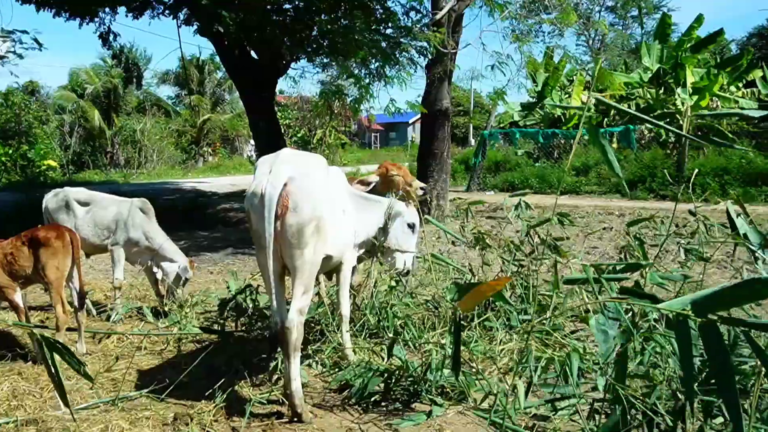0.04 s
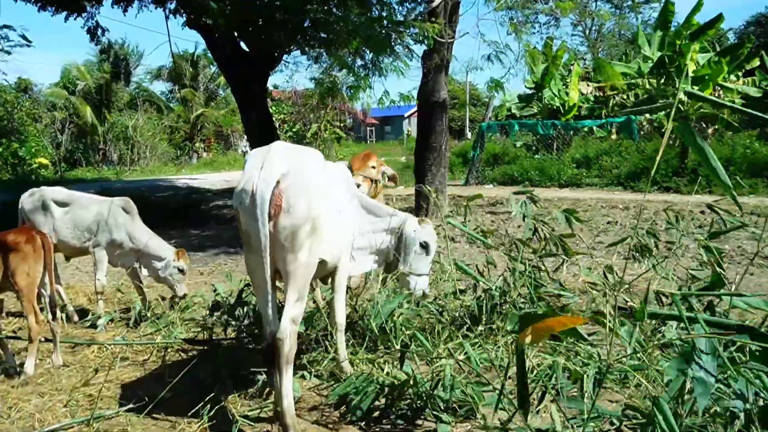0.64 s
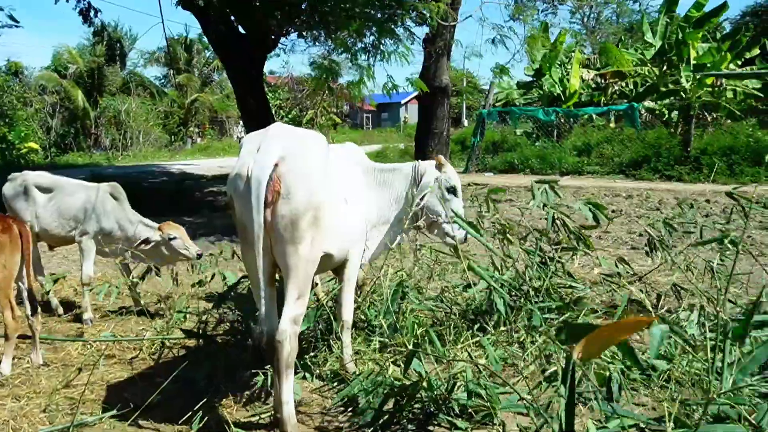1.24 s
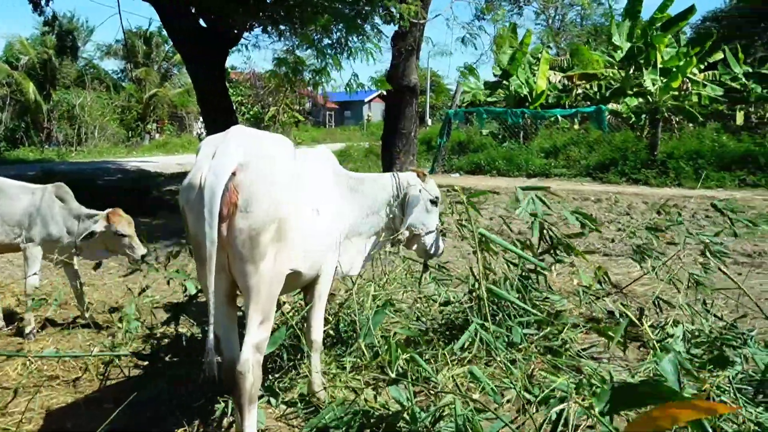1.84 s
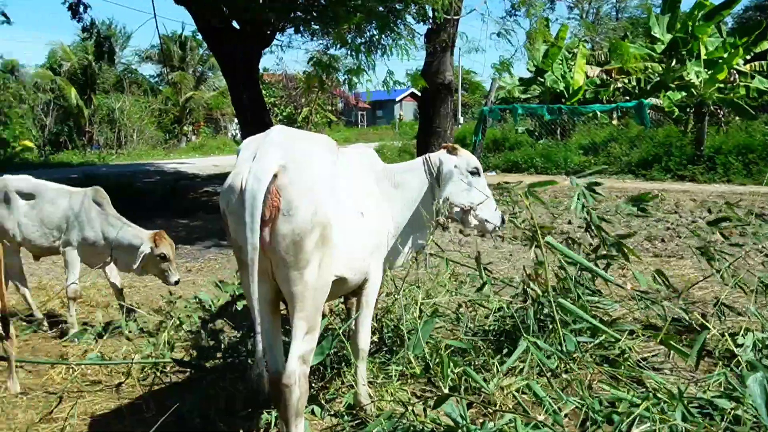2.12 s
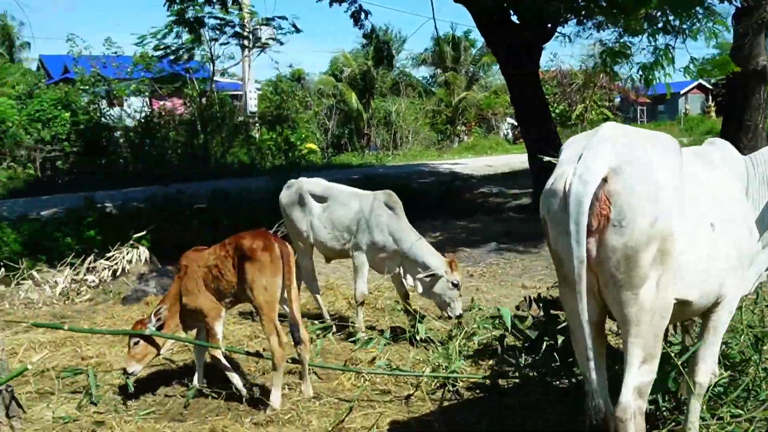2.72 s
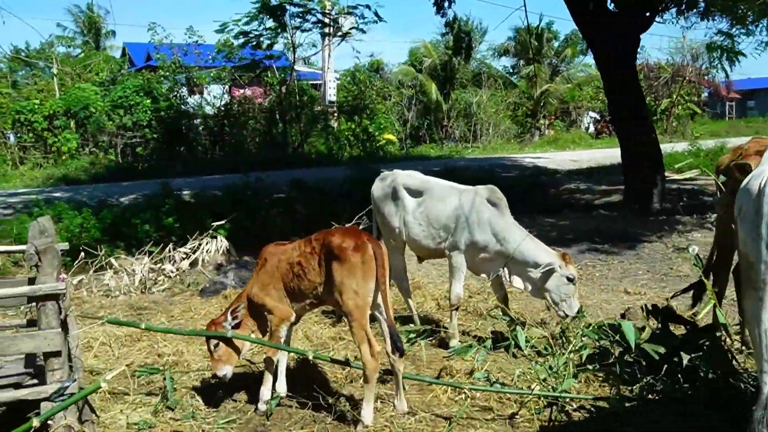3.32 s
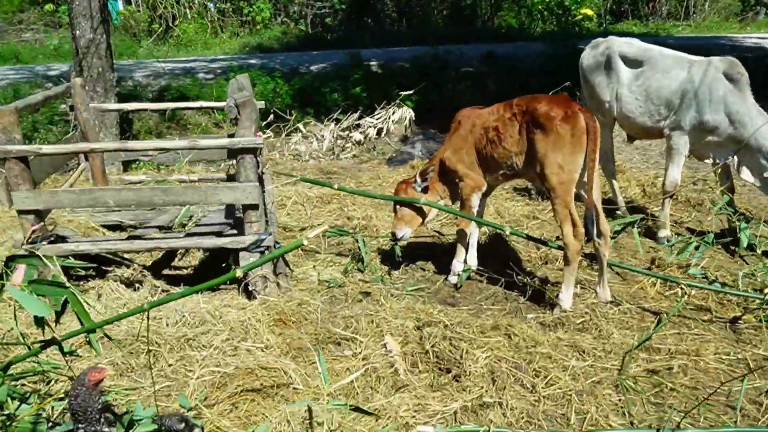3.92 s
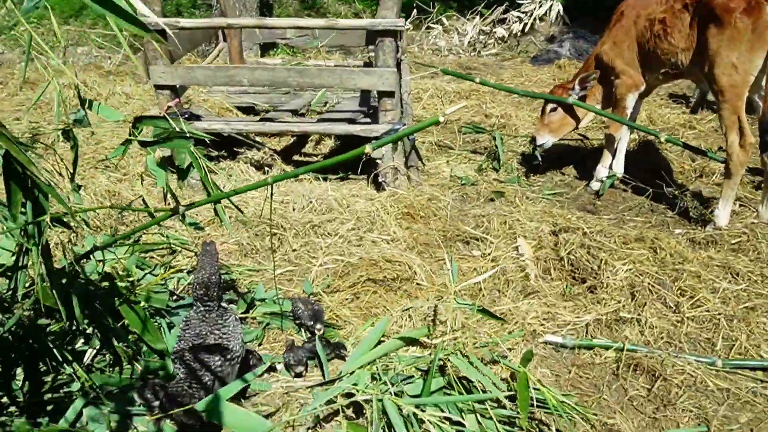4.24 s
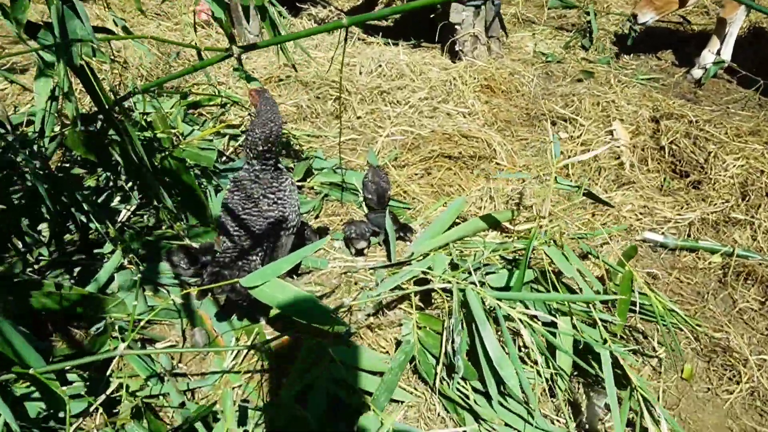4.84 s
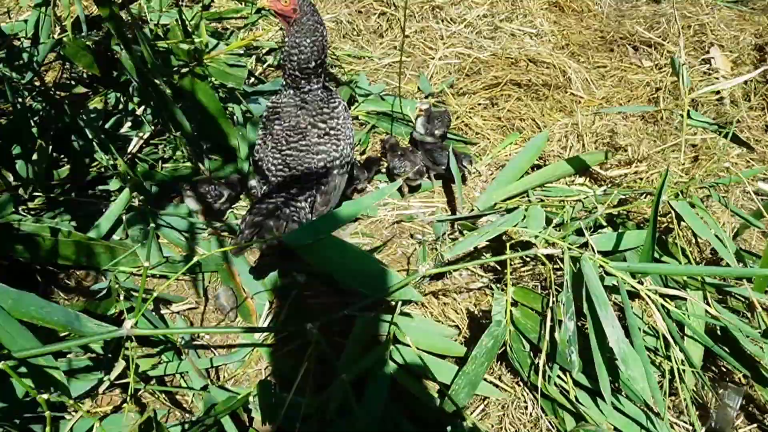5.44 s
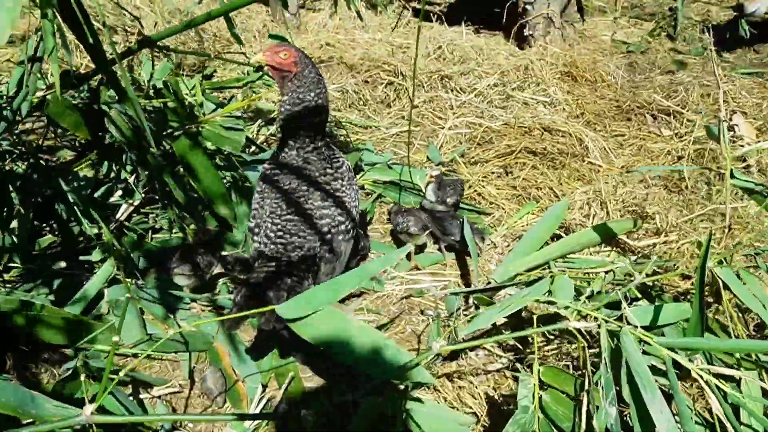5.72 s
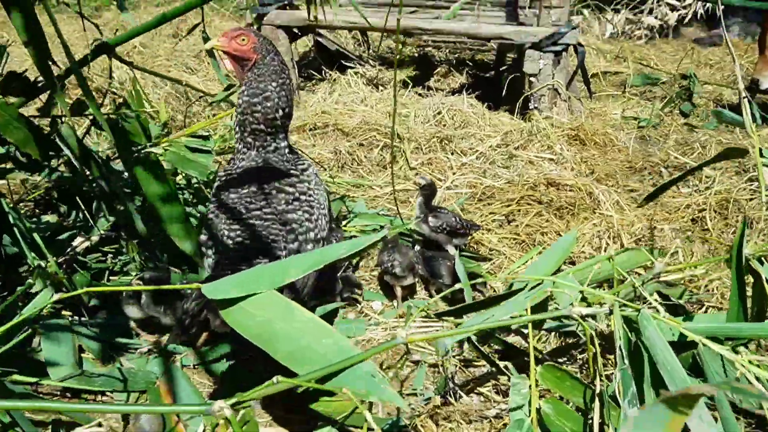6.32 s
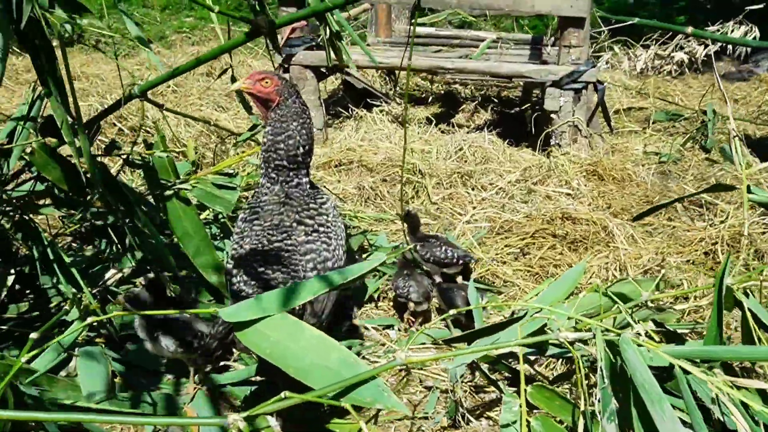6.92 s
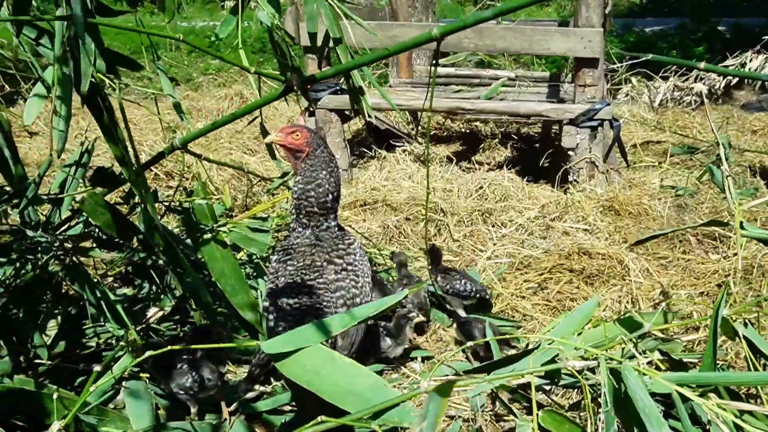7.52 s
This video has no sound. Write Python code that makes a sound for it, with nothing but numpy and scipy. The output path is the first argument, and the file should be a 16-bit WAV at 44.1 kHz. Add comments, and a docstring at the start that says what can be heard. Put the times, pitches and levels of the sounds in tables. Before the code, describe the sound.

In a breezy farmyard, cattle pull at a heap of cut cane leaves, which rustle steadily while stalks snap and a bundle drops with a soft bump. Roosters crow faintly far away, and gusts rumble lightly on the microphone. Chicks peep in short, thin whistles, growing closer and busier. Near the end dry straw crunches and a nearby hen clucks and gives fluttering warning trills.

```python
"""A farmyard on a breezy day. Cattle pull at a heap of cut cane leaves, which rustle, crackle and
snap, and a bundle drops with a bump. Gusts rumble on the microphone over soft air and a faint hum.
Roosters crow far off and a distant bird gives a few low calls. Chicks peep in short whistled swoops
as they come nearer; their hen clucks and, near the end, gives fluttering warning trills.
The birds are gliding tones with weak overtones; the leaves and the wind are shaped noise."""
import sys
import numpy as np
from scipy import signal
from scipy.fft import rfft, irfft, next_fast_len
from scipy.io import wavfile
from scipy.ndimage import uniform_filter1d

SR = 44100
rng = np.random.default_rng(int(sys.argv[2]) if len(sys.argv) > 2 else 0)


def put_to_file(sound):
    """Save the sound as 16-bit audio at rate SR, in the file named by the first command-line argument."""
    columns = np.atleast_2d(sound).T  # one column per channel
    safe = np.clip(columns, -1, 1)
    whole_steps = np.round(safe * 32767)
    wavfile.write(sys.argv[1], SR, whole_steps.astype(np.int16))


N = 333396
T = np.arange(N) / SR


def undb(db):
    """Turn decibels into a number to multiply by."""
    return 10 ** (np.asarray(db) / 20)


def unit(x):
    """Scale a sound to an average strength (rms) of 1."""
    return x / np.sqrt(np.mean(x ** 2))


def add(track, start, sound):
    """Mix a sound into a track at a time in seconds."""
    i = max(int(start * SR), 0)
    track[..., i:i + sound.shape[-1]] += sound[..., :max(N - i, 0)]


def colour(x, points):
    """Turn lows and highs up or down along a curve of (Hz, dB) points."""
    hz, db = np.transpose(points)
    size = next_fast_len(N)
    bin_hz = np.maximum(np.arange(size // 2 + 1) * SR / size, 1)
    gain = undb(np.interp(np.log(bin_hz), np.log(hz), db))
    return irfft(rfft(x, size) * gain, size)[..., :N]


def resonate(x, hz, q):
    """Keep the sound near one frequency; a higher q keeps a narrower band."""
    hz = min(hz, SR / 3)
    return signal.lfilter(*signal.iirpeak(hz, max(q, 3 * hz / SR), fs=SR), x)


def resonate_twice(x, hz, q):
    """The same resonance twice, for a band with steeper sides."""
    return resonate(resonate(x, hz, q), hz, q)


def wander(rate, size=N):
    """A smooth random wobble of size near 1, changing about rate times a second."""
    points = rng.standard_normal(int(size / SR * rate) + 3)
    joined = np.interp(np.arange(size) / SR * rate, np.arange(len(points)), points)
    return uniform_filter1d(joined, max(int(SR / rate / 2), 1)) * np.sqrt(2)


def fade(t, edge):
    """A soft start and end, each lasting edge, in the same unit as t."""
    return np.sin(np.pi / 2 * np.clip(np.minimum(t - t[0], t[-1] - t) / edge, 0, 1)) ** 2


def stereo(mid, side):
    """Make left and right from what the ears share (mid) and what sets them apart (side)."""
    return np.array([mid + side, mid - side])


# The tone of the distant air. Each row: frequency in Hz, relative level in dB.
AIR_TONE = [(24, -33), (40, -1), (81, -1), (207, 3.5), (658, -7), (863, 0.5), (1130, 0), (1330, -11),
            (1680, -14), (3000, -1.5), (3900, -20), (6600, -120)]

def countryside(air_db=-49, hum_hz=59, hum_db=-61):
    """Soft distant air and a faint, wavering low hum."""
    air = unit(colour(rng.standard_normal((2, N)), AIR_TONE))
    mid, side = air * undb(air_db + .5 * wander(2.74))
    pitch = hum_hz * (1 + .03 * wander(8))
    hum = np.sqrt(2) * undb(hum_db) * np.sin(2 * np.pi * np.cumsum(pitch) / SR)
    return stereo(mid + hum, .22 * side)


# The rumble's tone before its top is softened. Each row: frequency in Hz, relative level in dB.
RUMBLE_TONE = [(12, -39), (20, -15), (53, -2), (112, -2), (192, -4), (353, -10.5), (422, -7.5),
               (512, -12.5), (700, -21.5), (910, -49), (1540, -120)]
# Gusts of wind. Each row: time of the peak in seconds, length in seconds, relative level in dB.
WIND_GUSTS = [(.15, 0.33, -49), (.73, 0.04, -48), (2.24, 0.19, -42.5), (2.385, .08, -42),
              (2.805, 0.076, -41.5), (3.33, 0.15, -40), (3.49, 0.068, -45), (4.47, 0.15, -35),
              (4.804, .27, -35.5), (5.215, 0.14, -38.5), (5.414, 0.16, -39.5)]

def wind(breeze_db=-53, gain_db=-2, eddy_db=-17):
    """The breeze rumbles on the microphone; strong gusts shed small swirls that sound higher."""
    power = undb(breeze_db + .5 * wander(9)) ** 2
    for peak, length, db in WIND_GUSTS:
        power += undb(db) ** 2 * np.exp(-(2 * (T - peak) / length) ** 2)
    strength = np.sqrt(power) * undb(gain_db + wander(22))
    rumble = colour(rng.standard_normal((2, N)), RUMBLE_TONE)
    rumble = unit(signal.sosfilt(signal.butter(1, 190, fs=SR, output="sos"), rumble))
    eddies = unit(resonate(rng.standard_normal((2, N)), hz=187, q=.87))
    eddies *= undb(eddy_db) * (strength / strength.max()) ** .66
    mid, side = (rumble + eddies) * strength
    return stereo(mid, .28 * side)


def crackle(rate, spread_db):
    """About rate tiny breaks a second, mostly small, each from its own direction (mid, side)."""
    when, how_big, where = rng.random((3, N))
    clicks = undb(spread_db * np.minimum(-np.log(1 - how_big), 5)) * (when < rate / SR)
    angle = 2 * np.pi * where
    placed = clicks * np.array([np.cos(angle), np.sin(angle)])
    # smear each click in time without changing its tone
    spectrum = rfft(rng.standard_normal(48) * np.exp(-np.arange(48) / 9), 256)
    smear = np.roll(irfft(spectrum / np.abs(spectrum)), 32)
    return unit(signal.oaconvolve(placed, smear[None], axes=1)[:, :N])


# The steady stirring of the leaves between tugs. Each row: time in seconds, relative level in dB.
LEAF_STIR = [(.07, -40), (.12, -36.5), (.6, -37.5), (1.45, -42), (2.2, -44), (2.7, -41), (3.1, -42),
             (3.7, -37.5), (4.85, -36), (5.2, -38), (5.75, -37), (6, -39), (6.4, -37), (7.1, -37.5),
             (7.56, -38)]
# Tugs at the heap. Each row: time of the hardest pull in seconds, time to settle in seconds,
# relative level in dB, share of thick stalks in dB.
CATTLE_TUGS = [(.19, 0.078, -45.5, 4.5), (.32, 0.17, -35, -3), (.73, 0.031, -45, -3),
               (.935, 0.2, -30, -0.5), (1.78, .08, -44, -13), (2.25, 0.2, -55, 12), (2.83, 0.13, -46.5, 3),
               (3.18, 0.06, -43.5, -10), (3.54, 0.14, -43.5, 6), (3.92, .14, -39.5, -18),
               (4.3, 0.044, -42, 1), (4.53, 0.093, -37, -6), (4.75, 0.39, -37.5, -4), (5.47, 0.16, -38, -4),
               (7.25, 0.1, -38.5, -14)]
# The tone of the leaf blades. Each row: frequency in Hz, relative level in dB.
BLADE_TONE = [(150, -40), (250, -14.5), (717, -15), (1030, -15.5), (1100, -10), (1430, -7), (1670, -6),
              (2060, -5), (3110, -1.5), (4170, 0.5), (10600, -12), (14700, -19.5), (15500, -24)]
# How wide the leaves sound. Each row: frequency in Hz, level of the side against the mid in dB.
LEAF_WIDTH = [(60, -15), (110, -15), (200, -46), (380, -14), (700, -11), (1290, -13), (2380, -9),
              (4400, -6), (8120, -2.5), (15000, 0)]

def leaves(blade_gain_db=4, stir_stalk_db=-7, rise_s=.067):
    """Blades slide and crackle; each tug swells and settles, and thick stalks add a lower scrape."""
    stir_times, stir_db = np.transpose(LEAF_STIR)
    blade_power = undb(np.interp(T, stir_times, stir_db)) ** 2
    stalk_power = blade_power * undb(stir_stalk_db) ** 2
    for peak, settle, db, share_db in CATTLE_TUGS:
        age = T - peak
        pull = undb(db) * np.exp(-np.where(age < 0, (age / rise_s) ** 2, age / settle))
        blade_power += pull ** 2
        stalk_power += (pull * undb(share_db)) ** 2
    grains = rng.standard_normal((2, N)) + undb(-5) * crackle(rate=1800, spread_db=2)
    blades = unit(colour(grains, BLADE_TONE)) * undb(blade_gain_db + .99 * wander(45))
    scrape = rng.standard_normal((2, N)) + crackle(rate=450, spread_db=3.5)
    stalks = resonate(resonate(scrape, hz=2360, q=.74), hz=2380, q=.73)
    stalks += undb(-4.5) * resonate(scrape, hz=1114, q=4)
    mid, side = blades * np.sqrt(blade_power) + unit(stalks) * np.sqrt(stalk_power)
    lean_right = undb([[-.38], [.38]])
    return stereo(mid, colour(side, LEAF_WIDTH)) * lean_right


def voice(hz, second_db, third_db):
    """A bird's voice box: an almost pure tone with two weak overtones."""
    phase = 2 * np.pi * np.cumsum(hz) / SR
    tone = np.sin(phase) + undb(second_db) * np.sin(2 * phase) + undb(third_db) * np.sin(3 * phase)
    return np.sqrt(2) * tone


# The roosters' held notes. Each row: start in seconds, length in seconds, pitch in Hz,
# fall in octaves (below zero it rises), relative level in dB.
CROW_NOTES = [(0, 0.42, 955, .03, -48), (1.02, 0.3, 895, .14, -44.5), (1.45, 0.1, 905, -0.073, -49),
              (1.5, 0.22, 1150, .13, -47), (1.82, 0.12, 1110, 0.037, -51), (2.36, 0.28, 910, 0.079, -46.5),
              (4.65, .12, 890, 0, -45), (4.83, 0.15, 1130, .02, -41.5), (6.54, .2, 890, -0.16, -48.5)]

def roosters(gain_db=-4, weaken_db=3, edge_s=.035):
    """Only a crow's strongest tones carry this far; many paths through the trees blur and fade them."""
    out = np.zeros(N)
    for start, length, hz, fall, db in CROW_NOTES:
        u = np.linspace(-1, 1, int(length * SR))  # -1 at the note's start, 1 at its end
        pitch = hz * 2 ** (-fall * u / 2) * (1 + .024 * wander(150, len(u)))
        tone = voice(pitch, second_db=-12, third_db=-24)
        flicker = unit(1 + .35 * wander(90, len(u)))
        loudness = undb(db + gain_db - weaken_db * u / 2)
        add(out, start, tone * flicker * loudness * fade(u * length / 2, edge_s))
    return out


def peep(glide_hz):
    """A thin, slightly shaky whistle along a pitch glide; it swells, then stops short."""
    u = np.linspace(-1, 1, len(glide_hz))
    loudness = fade(u, .18) * undb(.5 * (u - u ** 2) + 1.4 * wander(200, len(u)))
    pitch = glide_hz * (1 + .012 * wander(500, len(u)))
    return voice(pitch, second_db=-24, third_db=-36) * loudness


# Peeps that swoop down. Each row: start in seconds, length in seconds, middle pitch in Hz,
# fall in octaves, level in dB.
PEEPS_DOWN = [(0.65, .025, 3950, .28, -36), (1.647, 0.045, 2950, .6, -43), (2.07, .025, 3250, 0.28, -42),
              (2.584, .046, 2820, 0.26, -47), (2.975, .05, 3000, 0.63, -42),
              (3.096, .023, 2850, 0.27, -34.5), (3.256, 0.031, 3450, 0.6, -37.5),
              (3.899, 0.042, 3480, .55, -37), (4.312, .04, 3490, .55, -34),
              (4.665, 0.023, 4120, 0.23, -33.5), (4.923, .042, 3390, .4, -36),
              (5.118, .018, 3310, .32, -34.5), (5.425, .035, 3020, .42, -37),
              (5.558, 0.041, 3130, .38, -39), (5.635, .023, 2990, 0.35, -34.5),
              (5.85, .035, 3180, .42, -39), (6.061, .045, 2990, 0.515, -39),
              (6.122, 0.024, 3520, .56, -32.5), (6.292, .024, 3790, .33, -28), (6.735, .039, 3100, .3, -33),
              (6.901, 0.035, 3100, .42, -29.5), (7.245, 0.036, 3005, .78, -24.5),
              (7.36, 0.04, 3350, 0.68, -32)]
# Peeps that sink, then climb. Each row: start in seconds, length in seconds, lowest pitch in Hz,
# final climb in octaves, level in dB.
PEEPS_DOWN_UP = [(0, 0.02, 4020, .03, -27.5), (1.513, 0.025, 3080, .25, -41),
                 (1.926, 0.043, 2550, .17, -42.5), (2.12, 0.021, 3250, .1, -40),
                 (2.187, 0.042, 2740, 0.24, -42), (2.325, .022, 3370, .03, -39.5),
                 (2.64, 0.047, 2920, .3, -40.5), (3.362, 0.034, 3010, .05, -42),
                 (3.484, .027, 3000, .52, -31), (4.36, .028, 3500, .22, -36),
                 (4.515, 0.027, 3880, .17, -33), (4.587, 0.032, 2780, .18, -32.5),
                 (4.738, 0.03, 3230, .26, -27), (5.056, 0.027, 2960, 0.35, -36),
                 (5.162, 0.041, 3220, .27, -32), (5.203, 0.0194, 3550, .14, -35),
                 (5.376, 0.061, 3400, .02, -36), (5.812, 0.027, 3360, .34, -30),
                 (6.191, 0.042, 2910, 1, -30), (6.378, 0.032, 3230, .36, -23),
                 (6.912, 0.046, 3280, 0.58, -32.5)]

def chicks(sink_octaves=.181, faint_per_s=4):
    """Near chicks' peeps swoop down, or sink and hook up again; the others peep faintly at random."""
    out = np.zeros(N)
    faint_peeps = [(when * T[-1], .035, 3260 * 2 ** ((pitch - .5) / 2), .39, -51)
                   for when, pitch in rng.random((int(faint_per_s * T[-1]), 2))]
    for start, length, hz, fall, db in PEEPS_DOWN + faint_peeps:
        u = np.linspace(-1, 1, int(length * SR))
        add(out, start, peep(hz * 2 ** (-fall * u / 2)) * undb(db))
    for start, length, hz, climb, db in PEEPS_DOWN_UP:
        u = np.linspace(-1, 1, int(length * SR))
        octaves = np.where(u < 0, sink_octaves, climb) * np.abs(u) ** 2.4
        add(out, start, peep(hz * 2 ** octaves) * undb(db))
    return out


# Stalks breaking. Each row: start in seconds, peak level in dB, centre of the crack in Hz,
# level of the knock against the crack in dB.
STALK_SNAPS = [(.091, -19, 4970, -12), (.876, -13.5, 3000, -3), (.886, -17, 3200, -10),
               (.911, -9, 2560, -5), (.931, -14, 3560, -12), (1.012, -13, 3200, -6),
               (1.247, -20.5, 4450, -14), (1.323, -23, 2800, -14), (1.348, -26, 5500, -16),
               (1.527, -21, 4970, -14), (2.239, -23.5, 3800, -16), (2.514, -22, 6000, -7),
               (2.777, -20.5, 2450, 0), (2.885, -22.5, 2100, -10), (3.058, -22.5, 2800, -5),
               (3.165, -27, 2400, 15), (3.203, -18.5, 3400, -13), (4.259, -13, 4860, -11),
               (4.332, -19, 2800, -0.5), (4.489, -19, 2500, -1), (4.775, -20, 3200, -1),
               (5.625, -16.5, 2690, -26), (6.065, -17, 4000, -12), (6.374, -13.5, 3000, -1),
               (6.564, -15, 5270, -8)]

def snaps(knock_hz=1150):
    """A stalk breaks with a short crack, its hollow body knocks, and its fibres splinter."""
    out, t = np.zeros((2, N)), np.arange(SR // 16) / SR
    decay = np.exp(-t / .0025) + .3 * np.exp(-t / .009)
    for start, db, hz, knock_db in STALK_SNAPS:
        burst = rng.standard_normal((2, len(t))) * decay
        crack = resonate_twice(burst, hz, q=.89)
        knock = undb(knock_db) * resonate_twice(burst, knock_hz, q=1)
        mid, side = crack + knock
        add(out, start, stereo(mid, .12 * side) / np.abs(mid).max() * undb(db))
    return out


# Dry straw being crushed. Each row: start in seconds, length in seconds, level in dB.
STRAW_CRUNCHES = [(.872, .03, -34), (.925, 0.055, -39), (3.047, 0.15, -40.5), (4.26, 0.037, -44),
                  (6.137, .22, -31.5), (6.332, .29, -34), (6.876, 0.09, -37), (7.195, 0.31, -38)]

def straw():
    """Dry stems give way in a bright burst of tiny breaks."""
    out = np.zeros((2, N))
    grains = .6 * crackle(rate=4000, spread_db=2.2) + rng.standard_normal((2, N))
    grains = unit(resonate_twice(grains, hz=6300, q=1.2))
    for start, length, db in STRAW_CRUNCHES:
        i, progress = int(start * SR), np.linspace(0, 1, int(length * SR))
        swell = np.sin(np.pi * progress) ** .72
        mid, side = grains[:, i:i + len(swell)] * undb(db) * swell
        add(out, start, stereo(mid, .49 * side))
    return out


def thud(start_s=.96, level_db=-39, rise_s=.0028, decay_s=.037):
    """The tugged bundle of cane drops on the ground with a dull bump."""
    age = np.maximum(T - start_s, 0)
    body = unit(resonate(rng.standard_normal(N), hz=185, q=1.6))
    return body * undb(level_db) * np.exp(-age / decay_s) * (1 - np.exp(-age / rise_s))


# The hen's short clucks, plus three faint low calls from a distant bird. Each row: start in seconds,
# length in seconds, pitch in Hz, fall in octaves, level in dB, hoarseness (0 is clear).
CLUCKS_AND_CALLS = [(1.322, .055, 442, 0.058, -47, 0), (1.977, 0.025, 707, 0.38, -44, 1.3),
                    (2.269, 0.057, 410, 0.018, -52.5, 0.3), (3.056, 0.055, 398, 0.024, -52, 0),
                    (2.863, 0.035, 1000, 0.11, -44, 0.4), (4.27, 0.024, 1195, -0.02, -37.5, 0.4),
                    (5.734, 0.01, 730, 0.026, -43, .9), (5.793, 0.014, 590, -0.028, -41.5, 1),
                    (6.121, 0.025, 706, -0.22, -29.5, 0.34), (6.747, 0.035, 1040, 0.14, -33.5, 0.1),
                    (6.95, 0.017, 844, -0.41, -28.5, 0.8), (6.967, 0.028, 913, 0.32, -24, 0),
                    (7.111, 0.0096, 1055, 0.16, -29.5, 0.2), (7.172, 0.011, 1020, 0.17, -24.5, 0.25),
                    (7.204, 0.018, 1014, 0.016, -30, 0), (7.408, 0.0046, 830, 0.14, -26.5, 0.6),
                    (7.434, 0.021, 858, -0.077, -22, 0.13), (7.447, 0.013, 666, 0.053, -26.5, 0),
                    (7.514, 0.011, 920, -0.2, -27, 0.3)]

def clucks_and_calls(arch=.1, rasp=.051, rattle_hz=190):
    """Short notes that arch in pitch; an uneven rattle of the throat makes some hoarse."""
    out = np.zeros(N)
    for start, length, hz, fall, db, hoarse in CLUCKS_AND_CALLS:
        u = np.linspace(-1, 1, int(length * SR))
        pitch = hz * 2 ** (-fall * u / 2) * (1 + arch * (1 / 3 - u ** 2) + rasp * wander(627, len(u)))
        cycles = np.cumsum(rattle_hz * (1 + .24 * wander(263, len(u)))) / SR
        rattle = np.exp(1.6 * hoarse * np.cos(2 * np.pi * cycles))
        note = unit(voice(pitch, second_db=-21, third_db=-28) * rattle)
        add(out, start, note * undb(db) * fade(u, .44))
    return out


# The hen's warning notes, before the flutter pulls them down. Each row: start in seconds, length in
# seconds, middle pitch in Hz, fall in octaves, middle level in dB, flutter depth from 0 to 1.
TRILL_NOTES = [(5.377, 0.023, 1520, 0, -37, .6), (5.406, 0.055, 1418, 0.14, -30, .5),
               (5.776, 0.027, 1320, 0.067, -33.5, .5), (6.671, 0.04, 1640, 0.049, -31, 0.64),
               (6.695, .108, 1455, 0.055, -23, 0.8), (6.988, .02, 1350, .04, -23, 0.7),
               (7.008, 0.092, 1500, -0.18, -19, 0.41), (7.094, 0.023, 1455, -0.00052, -16.5, 0.14),
               (7.111, 0.065, 1502, -0.01, -19, 0.47), (7.175, 0.042, 1423, 0.1, -20.5, 0.65),
               (7.224, 0.0195, 1083, .2, -36, .5), (7.416, 0.037, 1350, 0, -33, .9),
               (7.454, 0.084, 1405, 0.15, -28.5, 0.95)]

def hen_trills(flutter_hz=66, sag=.22, dip_db=-15, rasp=.023, arch_octaves=.054, db_per_octave=43):
    """High, arched whines; the throat flutters, and each time it narrows, pitch and level sag."""
    out = np.zeros(N)
    for start, length, hz, fall, db, depth in TRILL_NOTES:
        u = np.linspace(-1, 1, int(length * SR))
        octaves = -fall * u / 2 - arch_octaves * u ** 2
        cycles = np.cumsum(flutter_hz * (1 + .198 * wander(48.4, len(u)))) / SR
        pulses = (1 - np.abs(np.sin(np.pi * cycles))) ** 1.61
        narrowing = pulses * depth * np.exp(.35 * wander(66, len(u)))
        pitch = hz * 2 ** octaves * (1 - sag * narrowing + rasp * wander(490, len(u)))
        effort_db = db_per_octave * octaves  # higher is also louder
        loudness = undb(db + effort_db + dip_db * narrowing + 1.1 * wander(317, len(u)))
        tone = voice(pitch, second_db=-27, third_db=-44)
        add(out, start, tone * loudness * fade(u * length / 2, .003))
    return out


def yard(direct, echo_db, ring_s):
    """Open ground: thin echoes from trees and fences follow the sound, dying by 60 dB in ring_s."""
    t = np.arange(SR // 2) / SR
    echoes = rng.standard_normal((2, len(t))) * undb(-60 * t / ring_s) * (t > .004)
    echoes /= np.sqrt(np.sum(echoes ** 2, axis=1, keepdims=True))
    mid, side = signal.oaconvolve(direct[None], echoes, axes=1)[:, :N] * undb(echo_db)
    return stereo(direct + mid, .051 * side)


def scene():
    """Far roosters with a longer echo, the other birds with a short one, leaves and wind all round."""
    birds = yard(chicks() + hen_trills() + clucks_and_calls(), echo_db=-14, ring_s=.15)
    crowing = yard(roosters(), echo_db=-7, ring_s=.4)
    return birds + crowing + leaves() + straw() + snaps() + thud() + wind() + countryside()


def record(dry):
    """Cut the highest treble steeply, above 15550 Hz."""
    return signal.sosfilt(signal.ellip(10, .2, 70, 15550, fs=SR, output="sos"), dry)


dry = scene()
out = record(dry)
put_to_file(out)
```